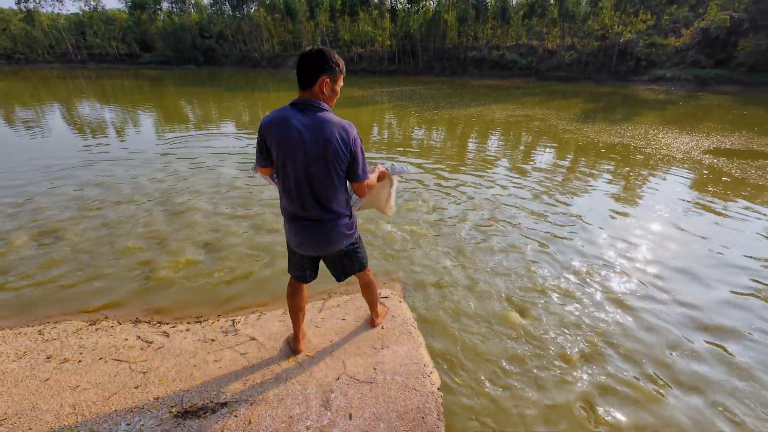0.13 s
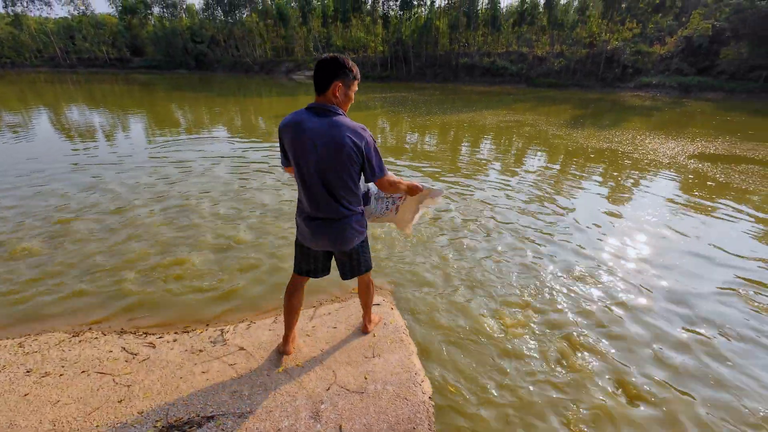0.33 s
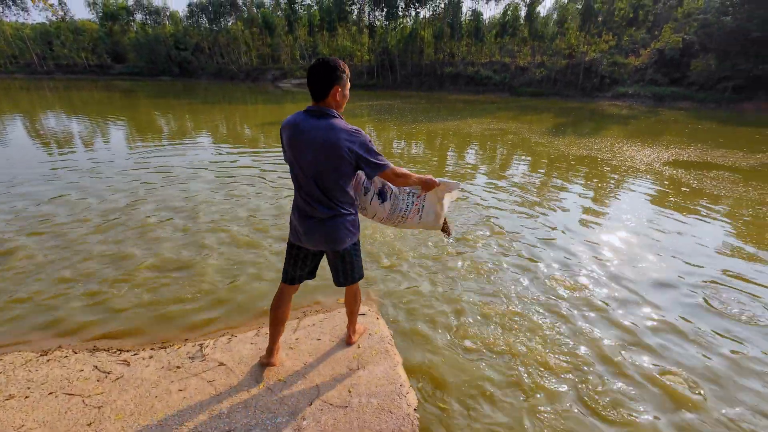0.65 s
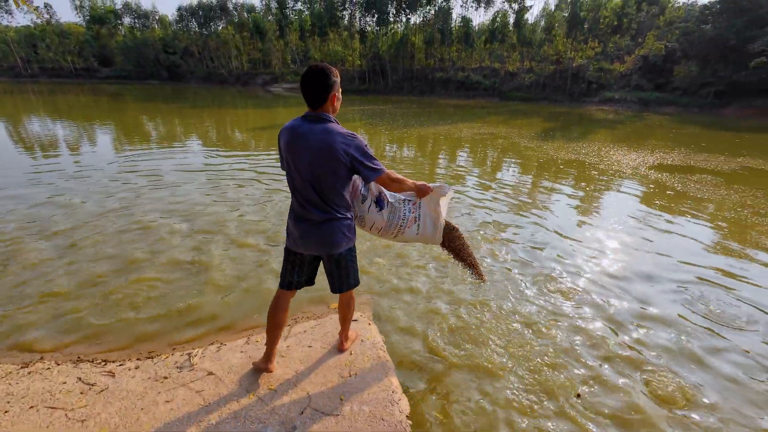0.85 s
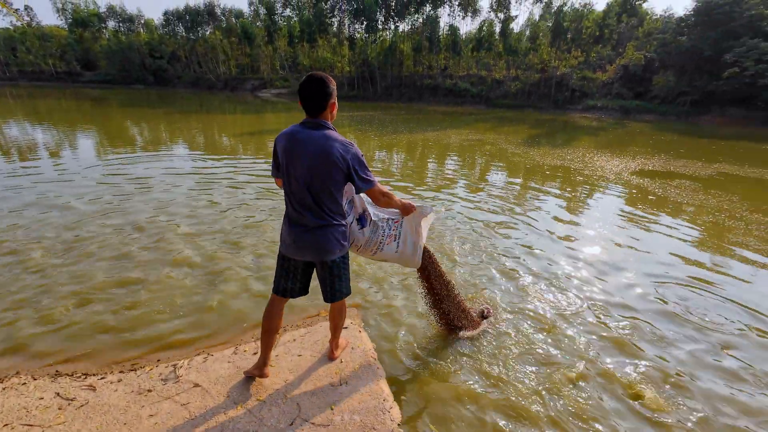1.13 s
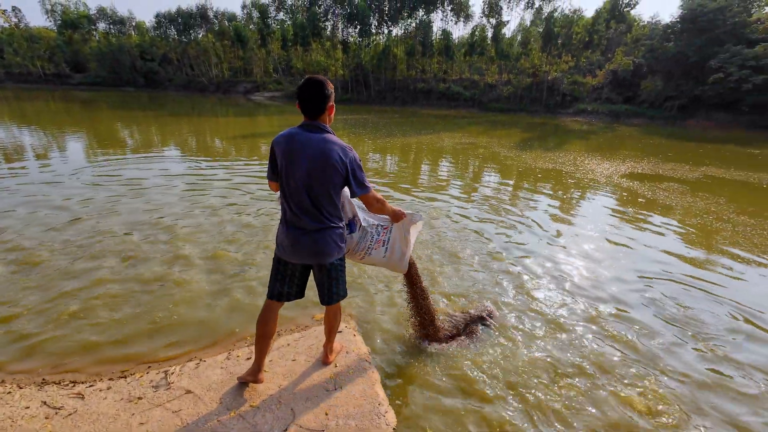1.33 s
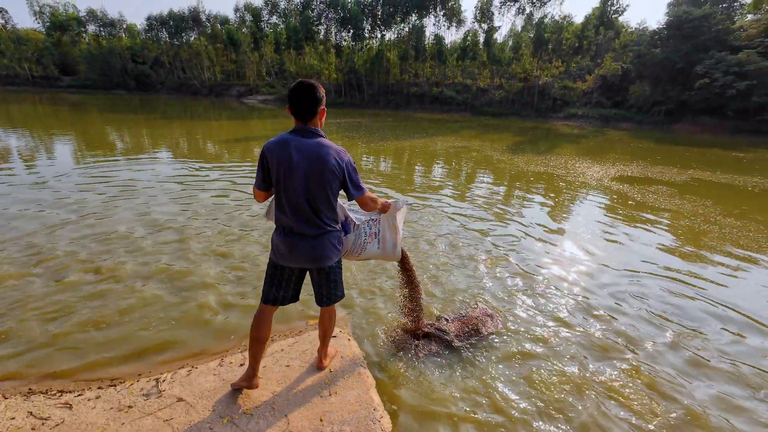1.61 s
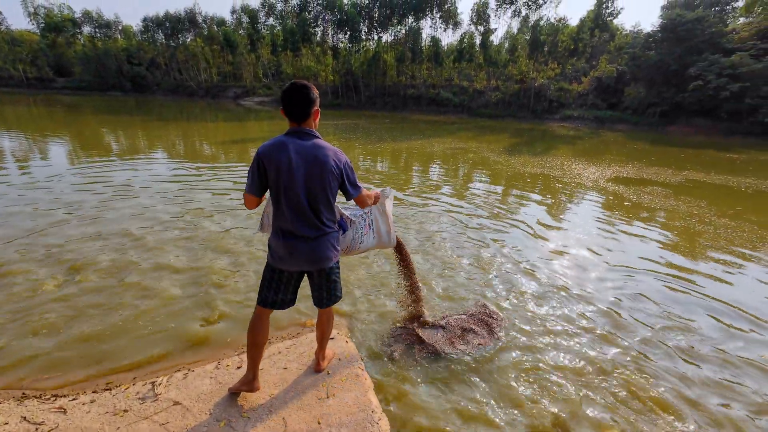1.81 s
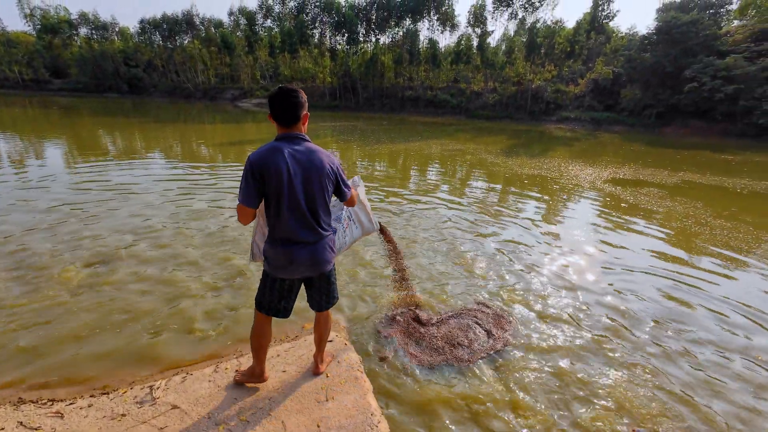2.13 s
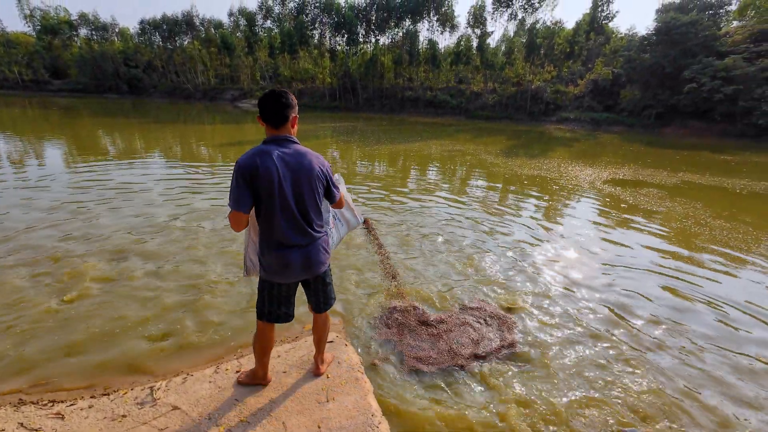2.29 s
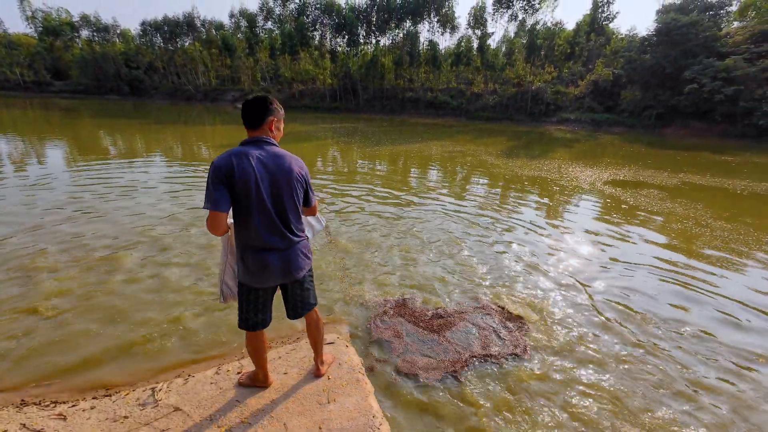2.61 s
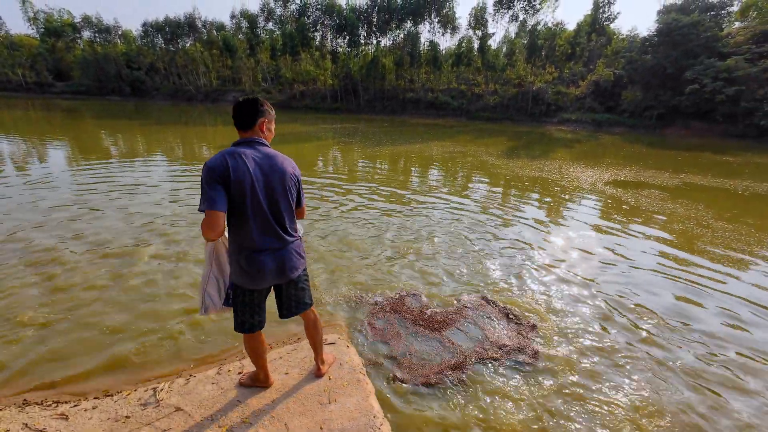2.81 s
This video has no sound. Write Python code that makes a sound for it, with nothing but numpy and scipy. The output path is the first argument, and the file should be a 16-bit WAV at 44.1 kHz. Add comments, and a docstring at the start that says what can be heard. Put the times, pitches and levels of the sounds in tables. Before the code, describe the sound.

Feed pellets pour into a pond. Lapping water, small bubbly gulps and a distant single-cylinder engine thumping unevenly about twenty times a second run throughout. Sack snaps cluster at 0.24-0.32 s, then a soft dry rush slides along the weave. From 1.03 s pellets strike water in a dense bright fizz, strong until 2 s, thinning to patter, ticks and drops by 2.95 s. Faint wind rumble and air hiss; close, open-air stereo.

```python
"""Dry feed pellets slide out of a woven sack and pour into a pond: dense noise-like crackle, then bubble fizz.
Fish gulp and splash at the surface: rising sine bubbles over a churn of small resonant clicks.
Snaps of the sack, drops, ticks and stray pellets are short bursts. A small single-cylinder engine thumps
unevenly some way off: smooth puffs through a pipe resonance. Light wind rumbles on the microphone ports,
and the air over the water hisses faintly: both are coloured noise."""
import sys
import numpy as np
from scipy import signal
from scipy.fft import rfft, irfft
from scipy.io import wavfile
from scipy.ndimage import uniform_filter1d

SR = 44100
rng = np.random.default_rng(int(sys.argv[2]) if len(sys.argv) > 2 else 0)


def ratio_of_db(decibels):
    """Turn decibels (scalar or array-like) into linear amplitude factors; 0 dB maps to 1."""
    return 10 ** (np.asarray(decibels, float) / 20)


def file_out(sig):
    """Save sig as 16-bit WAV at sys.argv[1]."""
    # one column per channel
    cols = np.atleast_2d(sig).T
    # limit, then scale
    lim = np.clip(cols, -1, 1)
    pcm = np.round(lim * 32767).astype(np.int16)
    wavfile.write(sys.argv[1], SR, pcm)


N = 130095  # length in samples


def rms_one(x):
    """Scale to rms 1."""
    return x / np.sqrt(np.mean(x ** 2) + 1e-20)


def in_time(rows):
    """Read a curve of (s, value) at every sample."""
    s, values = np.transpose(rows)
    return np.interp(np.arange(N) / SR, s, values)


def per_bin(points):
    """Read a curve of (Hz, value) at every FFT bin, interpolating along log frequency."""
    hz = np.maximum(np.arange(N // 2 + 1) * SR / N, 1)
    point_hz, values = np.transpose(points)
    return np.interp(np.log(hz), np.log(point_hz), values)


def colour(x, points):
    """Flatten the long-term spectrum, then give it the wanted one; rms 1."""
    spectrum = rfft(x)
    own = np.sqrt(uniform_filter1d(np.abs(spectrum) ** 2, size=1501) + 1e-12)
    return rms_one(irfft(spectrum / own * ratio_of_db(per_bin(points)), N))


def coloured_noise(points):
    """Steady noise with the wanted spectrum; rms 1."""
    spectrum = rfft(rng.standard_normal(N))
    return rms_one(irfft(spectrum * ratio_of_db(per_bin(points)), N))


def drift(rate_hz):
    """Slow chance with spread 1: noise at a 40th of the sample rate through two equal poles."""
    r = np.exp(-80 * np.pi * rate_hz / SR)
    noise = rng.standard_normal(N // 40 + 2002)
    slow = signal.lfilter([1], [1, -2 * r, r * r], noise)[2000:]  # without the settling of the filter
    return np.interp(np.arange(N) / 40, np.arange(len(slow)), rms_one(slow))


def flutter(rate_hz):
    """Quick chance with spread 1, without its slow swells."""
    quick = drift(rate_hz)
    return rms_one(quick - uniform_filter1d(quick, size=5000))


def ring(clicks, hz, t60_s):
    """Resonator: a unit click sets a decaying sine of initial height 1 ringing."""
    r, w = ratio_of_db(-60 / (t60_s * SR)), 2 * np.pi * hz / SR
    return signal.lfilter([0, np.sin(w)], [1, -2 * r * np.cos(w), r * r], clicks + 1e-18)


def grains(rate, low_hz, high_hz, cycles, spread_db):
    """Random clicks (rate per s) of uneven size ring 24 resonators for some cycles to -60 dB; rms 1."""
    sizes = ratio_of_db(spread_db * np.minimum(rng.exponential(1, N), 5)) * rng.choice([-1, 1], N)
    clicks = sizes * (rng.random(N) < rate / SR)
    dealt = rng.integers(0, 24, N)
    out = np.zeros(N)
    for k, hz in enumerate(np.geomspace(low_hz, high_hz, 24)):
        out += ring(clicks * (dealt == k), hz, cycles / hz)
    return rms_one(out)


def add(out, s, sound):
    """Mix a sound in at a time, trimmed to the ends of the scene."""
    i = int(s * SR)
    sound = sound[max(-i, 0):N - i]
    out[max(i, 0):max(i, 0) + len(sound)] += sound


def sack():
    """Pellets rub along the weave: very dense dry crackle, thickened with plain noise."""
    # level of the rush in the sack, before a fixed lift: time_s, level_db
    flow = [(0, -71), (.22, -62), (.29, -51), (.34, -46), (.4, -41), (.5, -39), (.6, -39.5), (.7, -40),
            (.8, -41.5), (.9, -43.5), (1.02, -44.5), (1.3, -36.5), (1.6, -66.5)]
    # relative spectrum of the rubbing: frequency_hz, density_db (dB per Hz)
    weave_tone = [(710, -9), (1200, -9), (1670, -8.5), (2360, -10), (2950, -11.5), (4020, -12.5),
                  (4380, -12), (7020, -17.5), (9890, -15), (11400, -18.5), (13200, -11.5), (15500, -23)]
    rate = 9000 * ratio_of_db(1.5 * flutter(19))
    rub = grains(rate, 1350, 17500, cycles=1.2, spread_db=1.5)
    rub = rub + 0.91 * rng.standard_normal(N)
    level_db = in_time(flow) + 3.5 + 0.39 * flutter(25)
    return ratio_of_db(level_db) * colour(rub, weave_tone)


def shower():
    """Pellets pierce the water: fizz of tiny bubbles and impact crackle, sparser as the stream thins."""
    # level of the stream striking the water, before a small lift: time_s, level_db
    pour = [(1.0, -65), (1.025, -39), (1.06, -33), (1.1, -27.5), (1.15, -26.5), (1.25, -25.5), (1.33, -27),
            (1.45, -27), (1.58, -26), (1.7, -27.5), (1.8, -26.5), (1.95, -28), (2.1, -28.5), (2.2, -30),
            (2.27, -30), (2.35, -31), (2.43, -32), (2.52, -31.5), (2.62, -36), (2.72, -38), (2.8, -39),
            (2.88, -41.5), (2.95, -45.5)]
    # relative spectrum of the pour: frequency_hz, density_db (dB per Hz)
    pour_tone = [(410, -62), (700, -14), (1000, -6.5), (1500, -5.5), (2280, 2.5), (3000, -0.5), (3800, 1),
                 (4600, -2), (6000, -2.5), (7030, -7), (7900, -4.5), (9000, -6.5), (10200, -4.5),
                 (11400, -9.5), (13100, -3.5), (14400, -13.5), (15500, -18)]
    # gain of the treble within the pour: time_s, gain_db
    treble_gain = [(1.0, -6), (1.2, -1.5), (1.5, 0), (2.0, 0.8), (2.5, -2.5), (2.75, 1.5), (2.85, -1),
                   (2.95, -7)]
    pour_db = in_time(pour)
    # impacts thin out by 1.5 dB for each dB the stream falls
    density = np.maximum(ratio_of_db(1.5 * (pour_db - pour_db.max())), .03)
    rate = 9000 * density * ratio_of_db(1.4 * flutter(40))
    bubbles = grains(rate, 1450, 9060, cycles=20.0, spread_db=0.0)
    impacts = grains(rate, 3500, 16700, cycles=1.95, spread_db=3.0)
    # undo the level loss of the thinning, so that the level curve alone sets the loudness
    fizz = rms_one((bubbles + 0.98 * impacts) / np.sqrt(density))
    whole = colour(fizz + 0.38 * rng.standard_normal(N), pour_tone)
    high_pass = signal.butter(1, 5500.0, "high", fs=SR, output="sos")
    treble = signal.sosfiltfilt(high_pass, whole)
    level_db = pour_db + 0.34 + 0.2 * flutter(22)
    return ratio_of_db(level_db) * (whole + (ratio_of_db(in_time(treble_gain)) - 1) * treble)


def bubble(level_db, hz, length_s):
    """A closing air pocket: a short, slightly rough sine that rises in pitch."""
    rise_per_s = 8.3  # pitch gained, as a share of the starting pitch
    t = np.arange(int(3 * length_s * SR)) / SR
    shape = t / length_s * 4.36 * np.exp(1 - t / length_s * 3.05)  # crest at a third of the length
    rough = 1 + .5 * np.sin(2 * np.pi * rng.uniform(110, 270) * t + rng.uniform(0, 8.9))
    tone = np.sin(2 * np.pi * hz * (t + rise_per_s * t * t / 2))
    return ratio_of_db(level_db) * shape * rough * tone


def fish():
    """Single gulps over a churn of many small random bubbles, each a resonator struck by a click."""
    # gulps and splash bubbles: nominal time_s, level_db (before shaping), starting pitch_hz, length_s
    gulps = [(0.19, -36, 496, 0.009), (0.265, -34, 600, 0.011), (0.288, -33, 574, 0.013),
             (0.308, -27.5, 525, 0.0078), (0.323, -35.5, 915, 0.014), (0.43, -35.5, 363, 0.01),
             (0.459, -34, 490, 0.013), (0.618, -35, 1030, 0.011), (0.651, -31, 860, 0.0067),
             (0.729, -34, 760, 0.009), (0.775, -37.5, 520, 0.01), (1.074, -32, 438, 0.009),
             (1.286, -41, 395, 0.011), (1.323, -35, 930, 0.016), (1.36, -31.5, 451, 0.016),
             (1.508, -33.5, 464, 0.013), (1.657, -25.5, 537, 0.0081), (1.763, -29, 317, 0.0078),
             (1.78, -36, 580, 0.021), (1.931, -34, 403, 0.018), (2.16, -31.5, 495, 0.012),
             (2.273, -33.5, 995, 0.0067), (2.306, -34, 544, 0.0072), (2.383, -34, 510, 0.013),
             (2.414, -31.5, 440, 0.0079), (2.455, -29, 793, 0.0079), (2.465, -30, 740, 0.009),
             (2.469, -23.5, 588, 0.0064), (2.545, -36, 500, 0.013), (2.647, -31, 1160, 0.0045),
             (2.813, -36, 1220, 0.009), (2.869, -38, 785, 0.009), (2.886, -36, 703, 0.012),
             (0.427, -39, 229, 0.013), (1.753, -35, 322, 0.016), (2.041, -34.5, 231, 0.011),
             (2.234, -34, 258, 0.014), (2.396, -35, 288, 0.015), (2.491, -32.5, 232, 0.013),
             (2.599, -39, 209, 0.02)]
    # level of the churn, before a fixed cut: time_s, level_db
    churn_level = [(0, -38), (.1, -43), (.2, -41.5), (.3, -34.5), (.38, -38), (.47, -35.5), (.55, -34),
                   (.65, -34.5), (.78, -37.5), (.9, -39), (1.02, -42.5), (1.12, -35), (1.3, -36.5),
                   (1.5, -38), (1.75, -34), (2.0, -39), (2.2, -36), (2.45, -40), (2.65, -37.5), (2.8, -45),
                   (2.9, -42), (2.95, -32)]
    # relative spectrum of the lapping water: frequency_hz, density_db (dB per Hz)
    lapping = [(200, 4), (291, -9), (400, -6.5), (559, 0), (800, -10.5), (1360, -8.5), (2500, -12.5),
               (4000, -14), (5200, -38), (8800, -80)]
    out = np.zeros(N)
    for s, level_db, hz, length_s in gulps:
        add(out, s - .002, bubble(level_db, hz, max(length_s, .004)))
    rate = 400 * ratio_of_db(2.5 * flutter(9.2))
    churn = grains(rate, 316, 2920, cycles=15.7, spread_db=2.0)
    churn = churn + .7 * rng.standard_normal(N)
    return out + ratio_of_db(in_time(churn_level) - 2.5) * colour(churn, [(100, -42), *lapping])


def drops():
    """Snaps and drops are bursts into a broad resonance; ticks are bright bursts; strays patter at random."""
    # snaps of the sack and drops: start_s, peak_db, pitch_hz, t60_s of the burst
    snaps = [(0.2362, -26, 2680, .012), (.238, -27.5, 1490, 0.036), (0.2484, -26, 1900, .012),
             (.251, -36, 3700, .012), (.2603, -29, 6200, .008), (.2925, -32, 2090, 0.014),
             (0.3005, -21, 3740, 0.0089), (.3108, -20, 1480, 0.022), (0.3175, -15, 3480, 0.0097),
             (0.3163, -27, 1240, 0.0069), (0.513, -27, 2400, .02), (.663, -22, 1300, 0.0071),
             (.68, -29, 2800, 0.01), (1.0286, -25.5, 2900, .012), (2.481, -24, 2370, 0.022),
             (2.4993, -19.5, 1800, 0.0043), (2.6931, -21.5, 2890, 0.017), (2.807, -29, 3000, 0.017),
             (2.847, -30, 2720, 0.013), (2.8885, -25.5, 3550, 0.017)]
    # broad ticks: start_s, level_db (before a fixed cut), t60_s
    ticks = [(0.0601, -24.5, 0.021), (0.178, -33, 0.0088), (1.37, -18.5, .004), (1.5395, -29, 0.0044),
             (2.6614, -13.5, 0.0047), (2.7285, -19, 0.0036), (2.9055, -32, .005)]
    # stray single pellets: time_s, rate (clicks per s)
    strays = [(0, 30), (.3, 40), (1, 20), (1.2, 60), (2.4, 77), (2.7, 110), (2.95, 80)]
    out, t = np.zeros(N), np.arange(2000) / SR
    for s, peak_db, hz, t60_s in snaps:
        burst = rng.standard_normal(2000) * ratio_of_db(-60 * t / t60_s)
        ringing = ring(burst, hz, 14.0 / hz)
        add(out, s, ratio_of_db(peak_db) * ringing / abs(ringing).max())
    high_pass = signal.butter(2, 3000.0, "high", fs=SR, output="sos")
    spray = signal.sosfilt(high_pass, rng.standard_normal(N))
    attack = 1 - np.exp(-t / 0.000087)
    for s, level_db, t60_s in ticks:
        stretch = np.roll(spray, -int(s * SR))[:2000]
        add(out, s, ratio_of_db(level_db - 1.5 - 60 * t / t60_s) * attack * stretch)
    patter = grains(in_time(strays), 1330, 13000, cycles=3.0, spread_db=4.5)
    return out + ratio_of_db(-56) * patter


def engine():
    """Each firing is a smooth puff that arrives by three paths and rings briefly in the exhaust pipe."""
    # engine speed: time_s, speed (firings per s)
    speed = [(0.0, 16.27), (0.147, 16.91), (0.224, 19.61), (0.31, 17.18), (0.407, 19.32), (0.559, 19.37),
             (0.75, 17.6), (0.898, 21.3), (1.043, 17.19), (1.141, 20.56), (1.38, 22.59), (1.456, 20.86),
             (1.725, 21.23), (1.779, 22.08), (1.829, 20.66), (1.916, 22.45), (2.169, 20.99), (2.23, 20.03),
             (2.566, 19.43), (2.642, 19.98), (2.702, 20.74), (2.95, 22.32)]
    # the puff and its reflections: delay_s, level_db (before the firing's own strength)
    paths = [(0, -22.5), (.0079, -22), (0.0288, -35)]
    # strength of the firings: time_s, gain_db
    effort = [(0, -2.5), (.15, -2.5), (.3, -1), (.45, 1.5), (.6, -1), (.8, 0.3), (1.05, -0.6), (1.3, 1),
              (1.6, 0), (1.8, .6), (2.0, -.6), (2.2, -1), (2.5, -2.1), (2.65, -3), (2.8, -0.5), (2.95, -3)]
    # weak firings, each the one nearest the time: time_s, gain_db
    misfires = [(2.19, -10), (2.29, -11), (2.39, -4)]
    first_firing, firings = .763 - 1, 62  # first one in firing intervals from time 0; how many
    puff_lead_s, puff_s = .0101, 0.0051
    pipe_hz, pipe_width_hz = 108, 115

    t = np.arange(-SR // 10, N) / SR  # begins a tenth of a second early
    turns = np.cumsum(np.interp(t, *np.transpose(speed))) / SR
    fired = np.interp(first_firing + np.arange(firings), turns - turns[SR // 10], t)
    spread_db = .8 * rng.standard_normal((firings, len(paths))).T
    strength_db = np.interp(fired, *np.transpose(effort)) + spread_db
    for s, gain_db in misfires:
        strength_db[:, np.argmin(abs(fired - s))] += gain_db

    puffs, puff = np.zeros(N), np.hanning(int(puff_s * SR))
    for (delay_s, path_db), strengths in zip(paths, strength_db):
        for s, firing_db in zip(fired[:-1], strengths):
            add(puffs, min(s - puff_lead_s + delay_s, N / SR), puff * ratio_of_db(firing_db + path_db))

    r = np.exp(-np.pi * pipe_width_hz / SR)
    poles = [1, -2 * r * np.cos(2 * np.pi * pipe_hz / SR), r * r]
    piped = signal.lfilter([(1 - r * r) / 2, 0, (r * r - 1) / 2], poles, puffs)
    return signal.sosfilt(signal.butter(3, 55.0, "high", fs=SR, output="sos"), piped)


def wind():
    """Light wind on the microphone ports: lumpy low rumble from slowly swelling noise."""
    # level of the wind, around which it swells: time_s, level_db
    gusts = [(0, -50), (.3, -48), (.6, -58), (1.2, -55), (1.6, -64), (2.2, -51), (2.95, -58)]
    # relative spectrum of the rumble: frequency_hz, density_db (dB per Hz)
    rumble_tone = [(12, -15), (25, 10), (40, -20), (52, -12), (65, -2), (85, 5.5), (140, -27)]
    level_db = in_time(gusts) + 4.4 * drift(3.8)
    return ratio_of_db(level_db) * coloured_noise([*rumble_tone, (400, -76)])


def air_hiss():
    """The far air over the water: steady coloured noise."""
    # relative spectrum of the air: frequency_hz, density_db (dB per Hz)
    air_tone = [(60, -44), (100, -12), (130, -2), (200, -23), (393, -18), (631, -18), (900, -9.5),
                (1770, -23.5), (4550, -25.5), (7110, -31), (10000, -31.5), (13100, -32), (15500, -35)]
    return ratio_of_db(-43.5) * coloured_noise(air_tone)


def scene():
    """Near sources reach two close microphone ports with small differences; the far air is wider."""
    # width of the near sources, before a fixed cut: frequency_hz, side_minus_mid_db
    near_width = [(60, -42), (300, -29), (700, -19), (1300, -41), (2500, -26), (3900, -18), (4400, -22),
                  (5300, -22), (6100, -14), (6500, -32), (7000, -40), (8000, -44), (8600, -12.5),
                  (10000, -7), (11200, -11), (13000, -7), (14200, -18), (15000, -26)]
    # width of the air: frequency_hz, side_minus_mid_db
    air_width = [(20, 5), (60, -27), (200, -15), (1000, -28), (2500, -8.5), (5000, -6), (7000, -7),
                 (12000, 1)]
    # level lean of the whole: frequency_hz, left_minus_right_db
    level_lean = [(3200, 0), (4000, 1.3), (4600, 2.2), (5500, 0), (6400, 3), (8100, -5), (8600, 5),
                  (9800, -5), (11200, 0.5), (12600, -3.5), (13400, 1.5)]
    # phase by which the left leads: frequency_hz, lead_rad
    phase_lead = [(4500, -0.066), (5200, 0.81), (6300, 0.15), (8100, 0.098), (8500, -.16), (9500, .04),
                  (10600, -0.25), (11600, -.04), (13000, .11), (14000, -.08)]
    near = sack() + shower() + fish() + drops() + engine()
    mid = rfft(near + air_hiss() + wind())

    apart = np.roll(near, 190) - 0.26 * np.roll(near, 431)  # delayed copies (samples) decorrelate the side
    side = rfft(apart) * ratio_of_db(per_bin(near_width) - 5.5)
    side = side + rfft(air_hiss()) * ratio_of_db(per_bin(air_width))
    side = side + rfft(ratio_of_db(-10) * wind())

    # half of the lean and lead goes to each ear, in opposite senses
    lean = ratio_of_db(per_bin(level_lean) / 2) * np.exp(.5j * per_bin(phase_lead))
    return np.array([irfft((mid + side) * lean, N), irfft((mid - side) / lean, N)])


def band_limit(x):
    """A steep low-pass at the top of the band."""
    return signal.sosfilt(signal.butter(12, 15710, fs=SR, output="sos"), x)


def record(dry):
    """A steep low-pass cuts the top, 60 dB down from 16 kHz."""
    low_pass = signal.cheby2(12, 60, 16000, fs=SR, output="sos")
    mix = signal.sosfilt(low_pass, dry)
    return band_limit(mix)


dry = scene()
out = record(dry)
file_out(out)
```